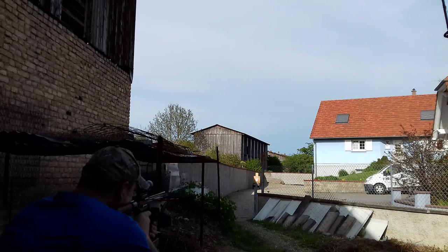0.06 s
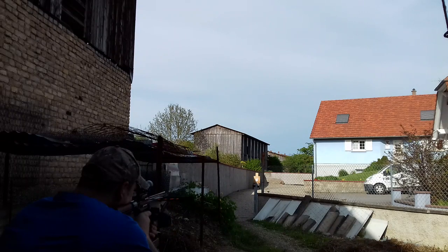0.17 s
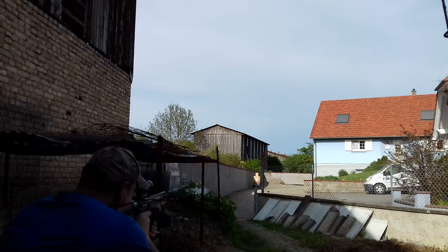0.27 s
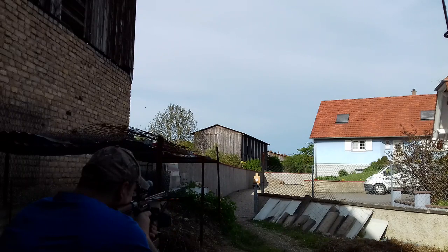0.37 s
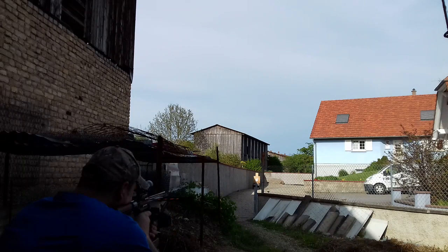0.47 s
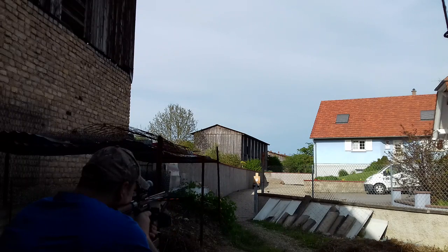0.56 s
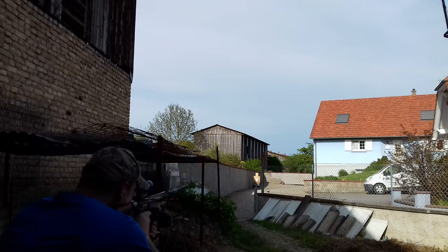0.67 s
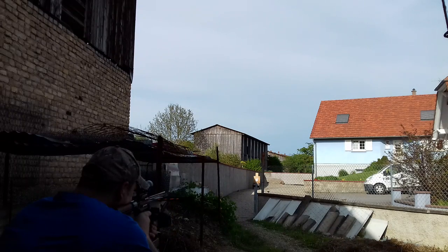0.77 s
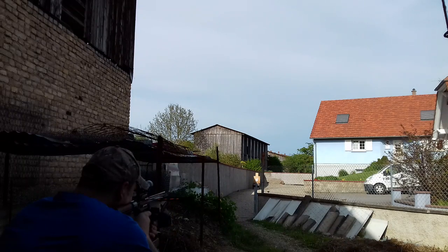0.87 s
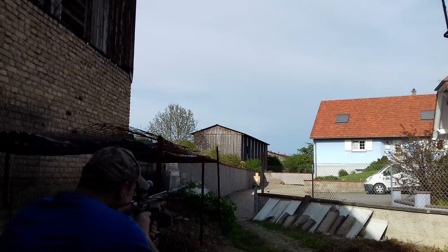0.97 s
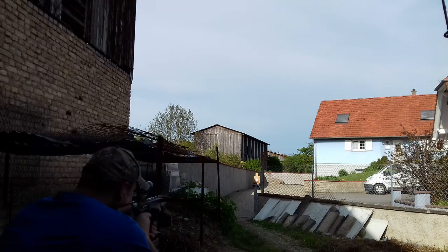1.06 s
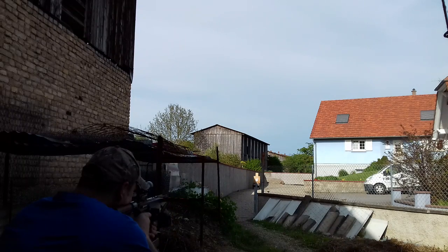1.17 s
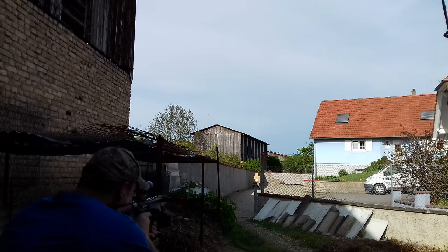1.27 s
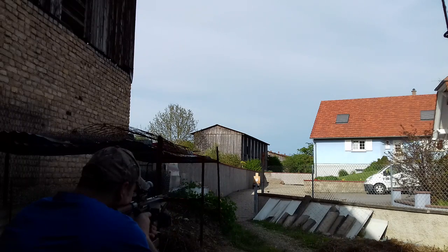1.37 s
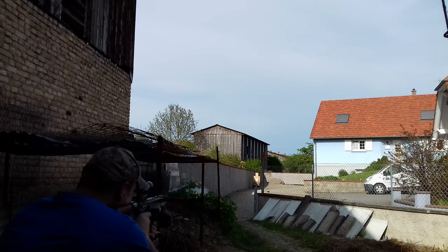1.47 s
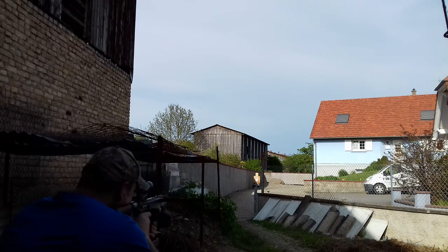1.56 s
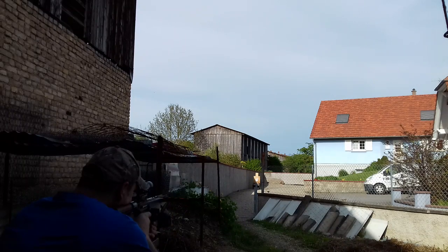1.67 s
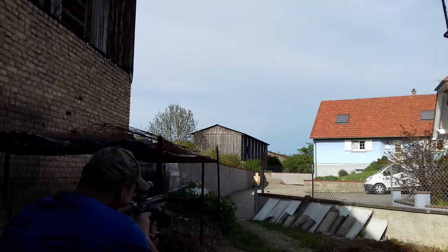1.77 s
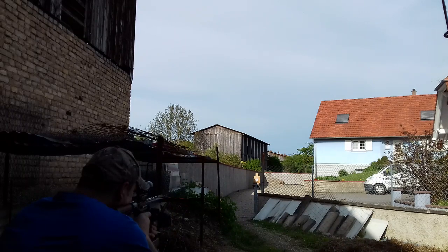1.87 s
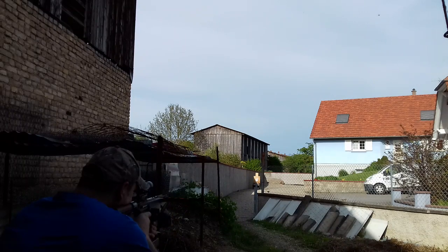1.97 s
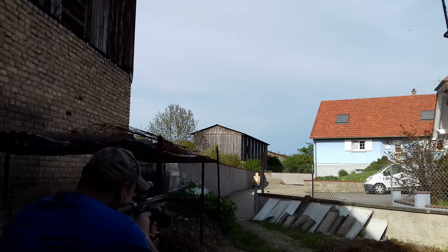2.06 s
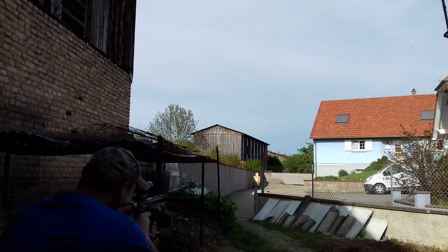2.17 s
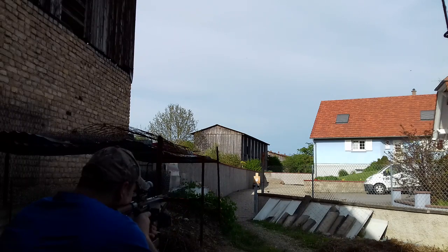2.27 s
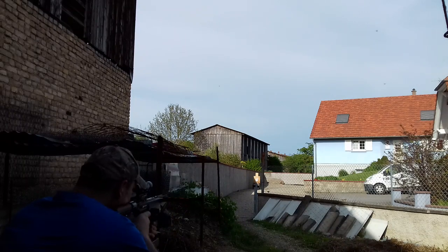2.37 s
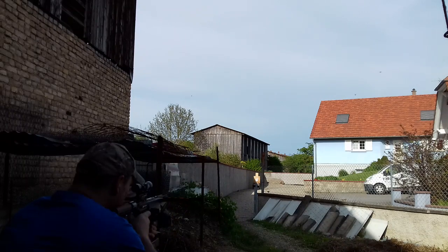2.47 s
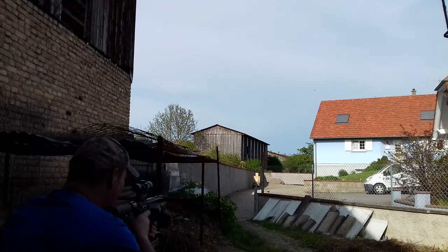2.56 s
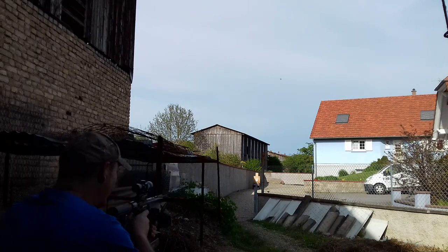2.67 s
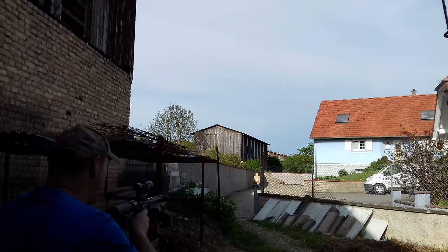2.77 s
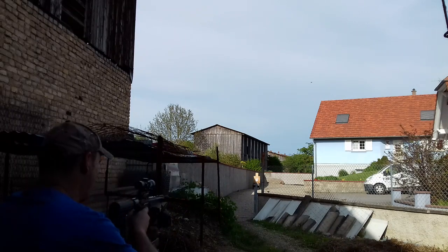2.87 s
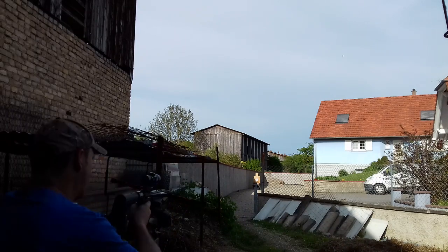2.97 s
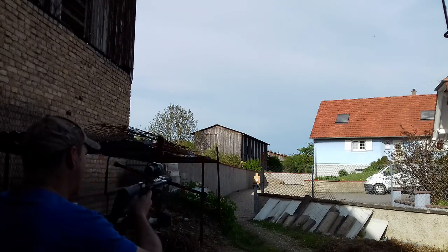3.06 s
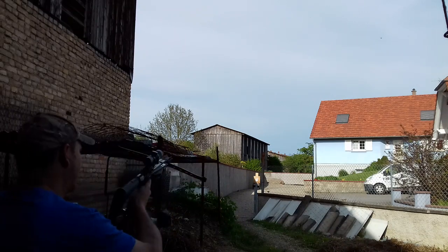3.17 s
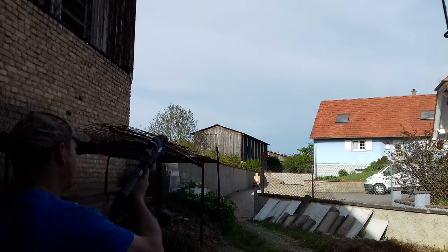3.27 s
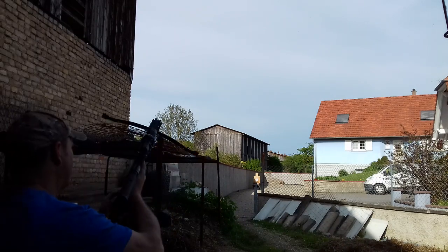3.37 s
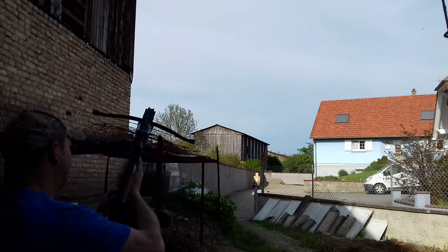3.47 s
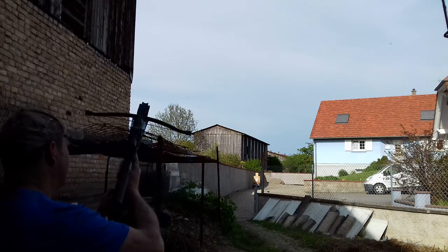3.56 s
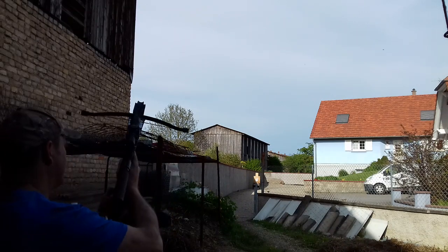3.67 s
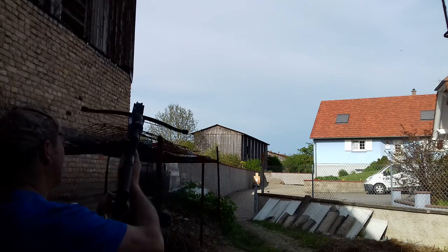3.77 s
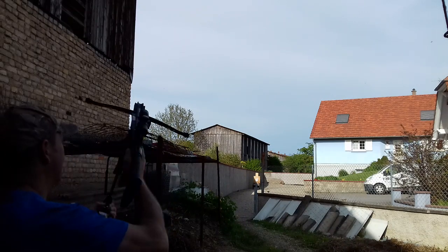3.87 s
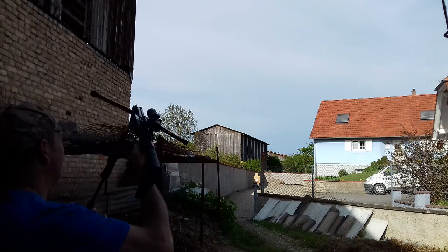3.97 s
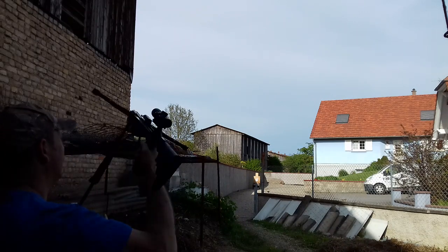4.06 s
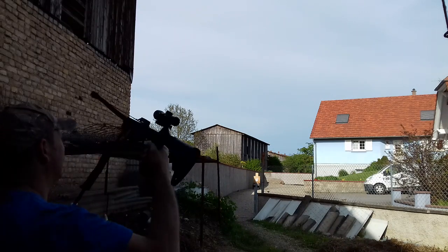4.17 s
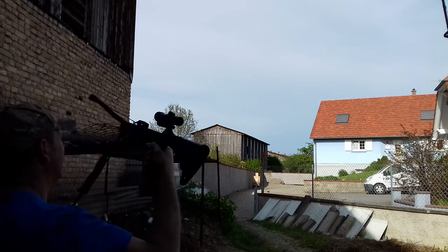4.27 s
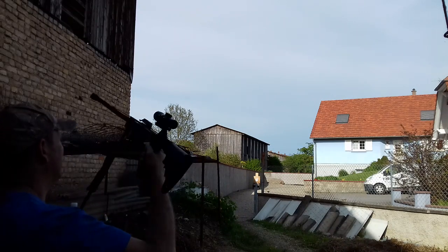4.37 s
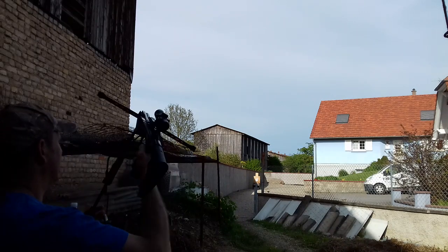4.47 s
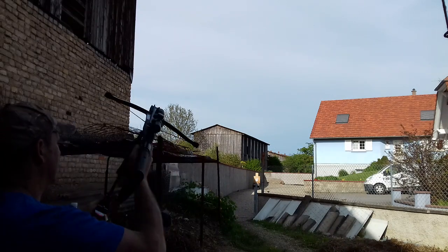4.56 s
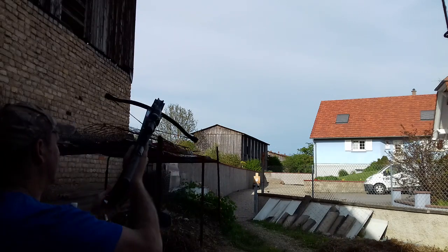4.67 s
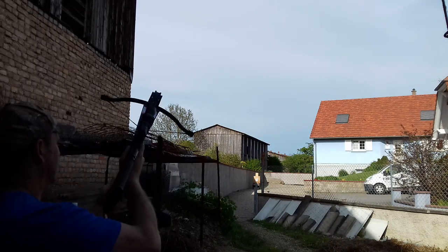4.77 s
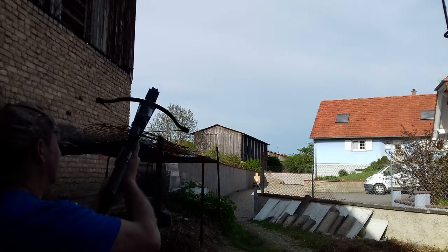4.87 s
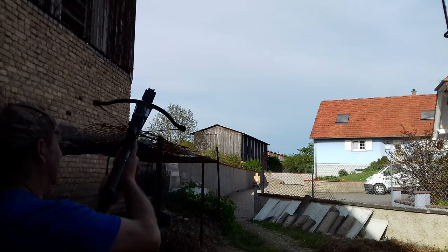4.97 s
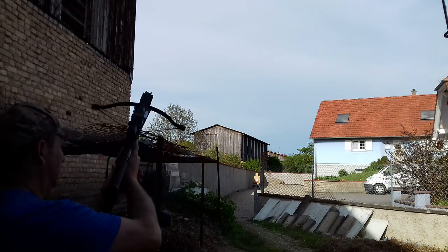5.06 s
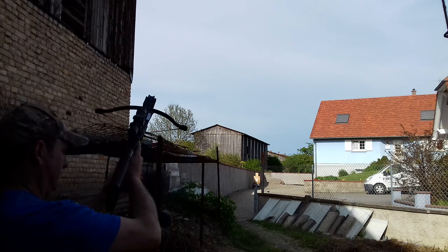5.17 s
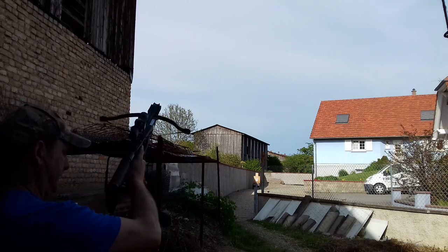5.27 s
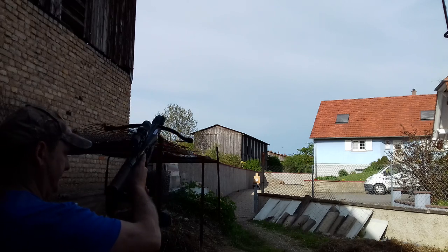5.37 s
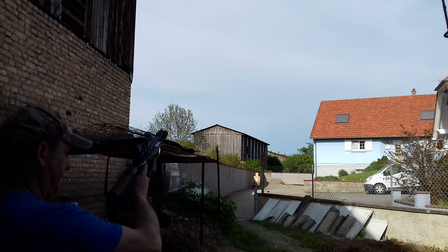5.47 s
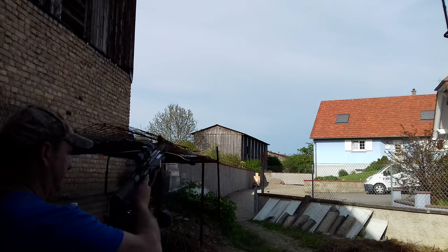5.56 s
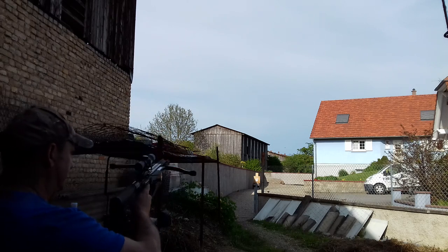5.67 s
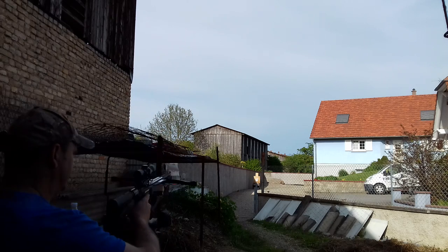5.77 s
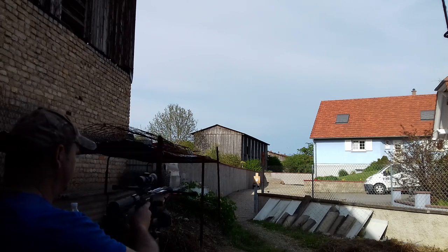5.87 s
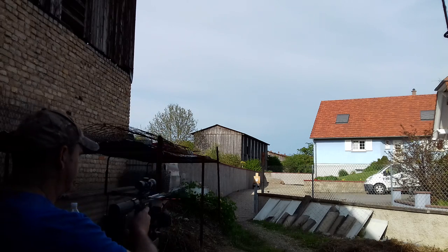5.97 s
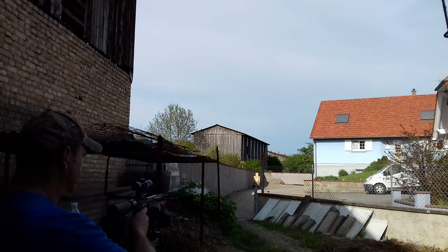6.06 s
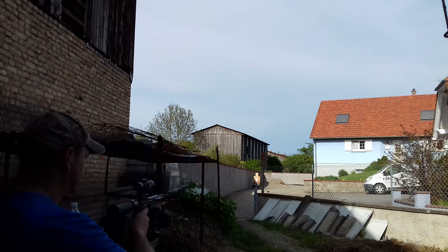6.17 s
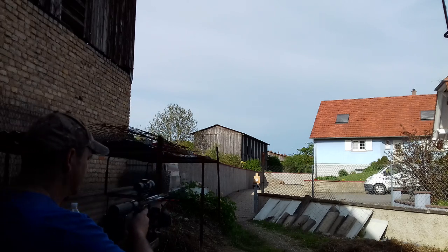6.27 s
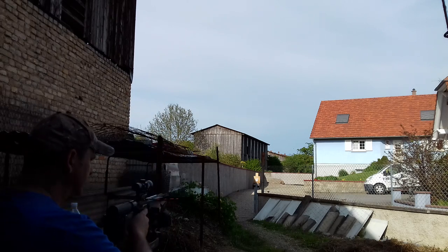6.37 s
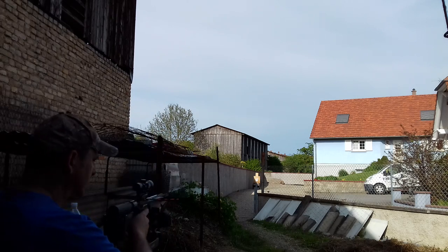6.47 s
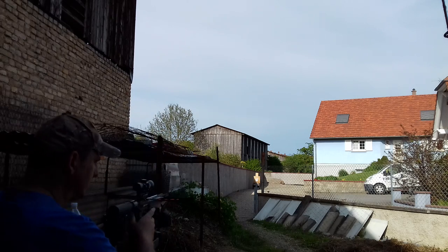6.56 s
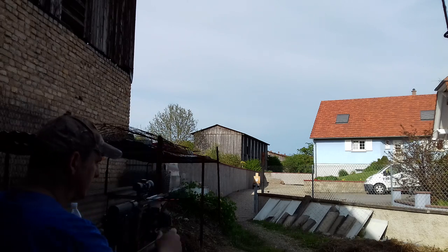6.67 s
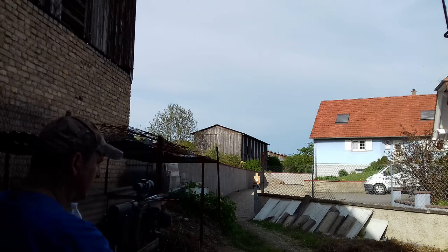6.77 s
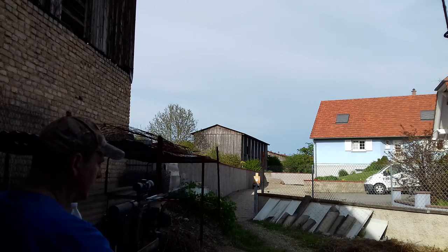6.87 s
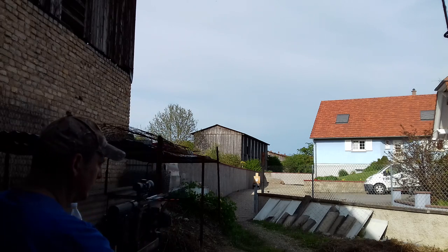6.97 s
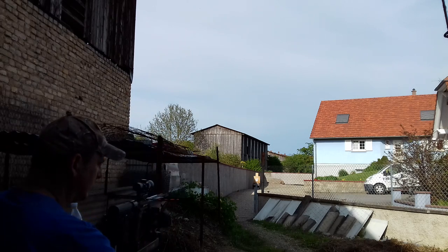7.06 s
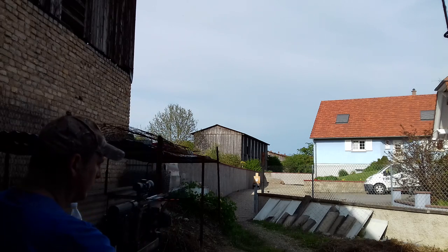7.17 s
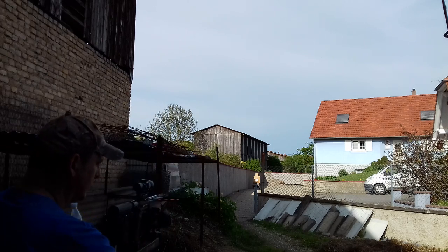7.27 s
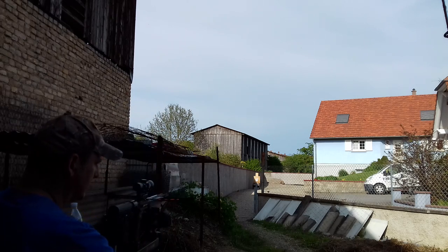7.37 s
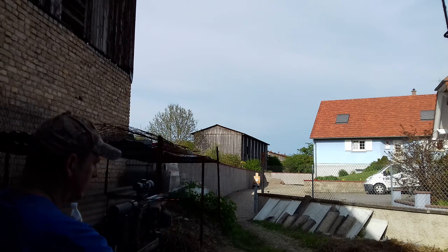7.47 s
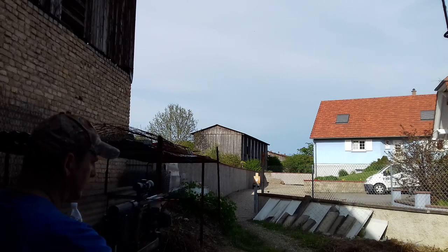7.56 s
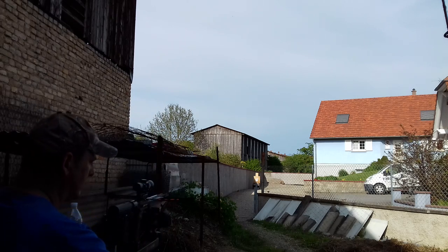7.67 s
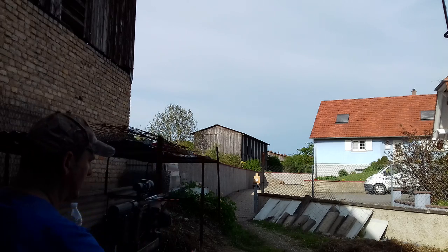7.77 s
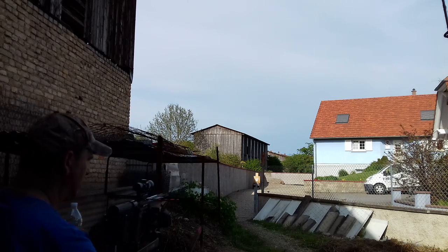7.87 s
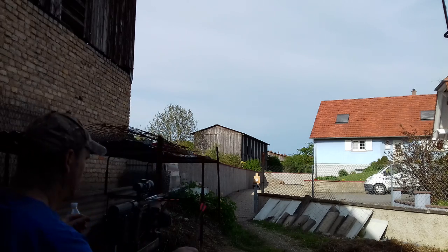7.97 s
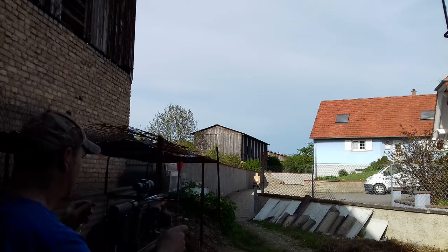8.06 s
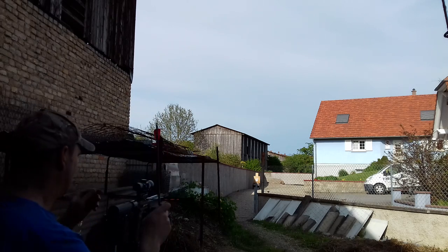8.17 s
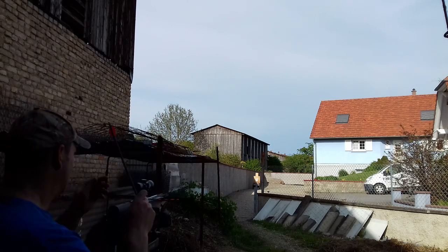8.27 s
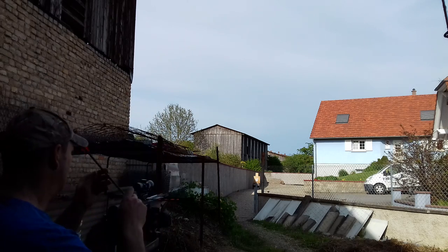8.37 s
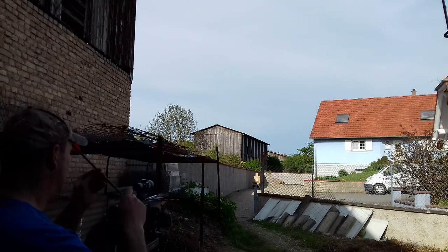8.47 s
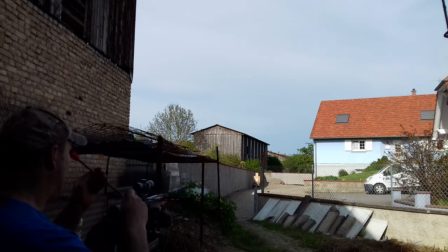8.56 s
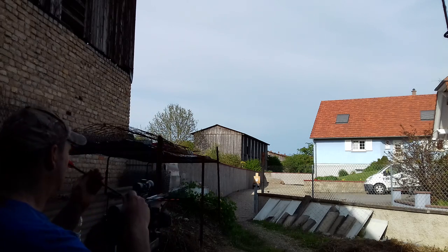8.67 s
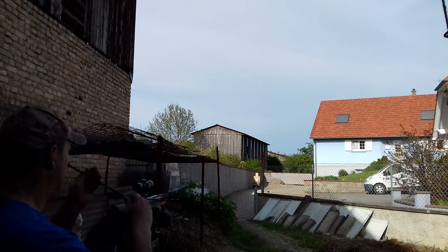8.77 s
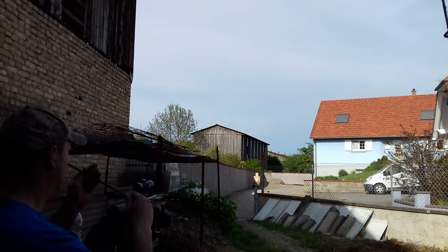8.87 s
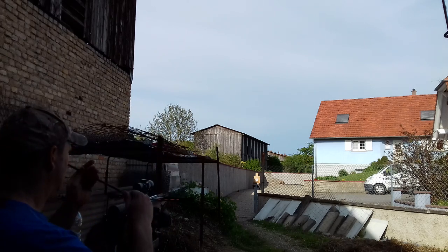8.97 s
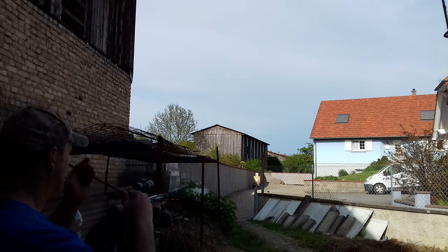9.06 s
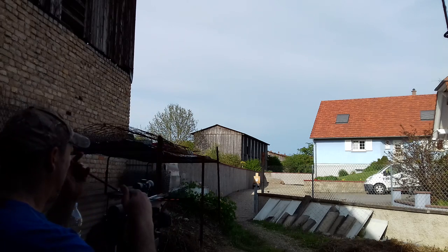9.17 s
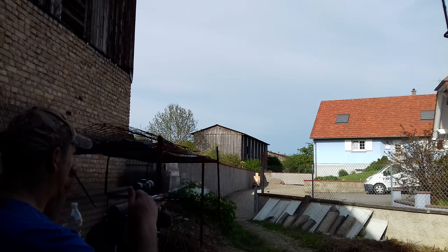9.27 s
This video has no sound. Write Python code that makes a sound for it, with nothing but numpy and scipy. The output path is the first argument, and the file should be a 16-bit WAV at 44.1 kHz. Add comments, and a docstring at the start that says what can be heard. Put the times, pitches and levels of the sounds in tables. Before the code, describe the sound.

A quiet outdoor yard with soft wind puffs on the microphone. At about one second a crossbow fires close by, a sharp, loud crack with a short echoing tail, followed by a faint dry knock from a distant target. Clothes rustle, small clicks follow, then the cocking lever is worked: creaky rubbing, a metallic clatter and a hard snap shut. Afterwards only light bumps, cloth brushes and a small springy ping.

```python
"""A quiet outdoor hush comes first, with light puffs of wind on the microphone: shaped noise.
Then a crossbow is fired in a walled yard, and its bolt knocks into a distant target: cracks, ringing modes and buzz.
The shooter works the cocking lever: the string rubs in noisy jerks, the catch clatters, the lever snaps shut.
Small parts click, clothes rustle as swelling noise, and buildings return smeared echoes over a decaying tail."""
import sys
import numpy as np
from scipy import signal
from scipy.fft import rfft, irfft, next_fast_len
from scipy.io import wavfile
from scipy.ndimage import uniform_filter1d, minimum_filter1d, map_coordinates

SR = 44100
rng = np.random.default_rng(int(sys.argv[2]) if len(sys.argv) > 2 else 0)


def master_out(mix):
    """Clip the mix to full scale and print it as 16-bit PCM to the path in sys.argv[1]."""
    frames = np.transpose(np.atleast_2d(mix))
    ceiling = np.clip(frames, -1, 1)
    pcm = np.round(ceiling * 32767).astype(np.int16)
    wavfile.write(sys.argv[1], SR, pcm)


N = 411012  # length in samples
T = np.arange(SR // 2) / SR  # half a second for one event, s
NOW = np.arange(N) / SR  # the whole scene, s


def amp(db):
    """Amplitude gain is ten to the power of decibels over twenty."""
    return 10 ** (np.asarray(db) / 20)


def unit(x):
    """Power normalisation: scale to rms 1."""
    return x / np.sqrt(np.mean(x ** 2) + 1e-20)


def unit_attack(x):
    """Onset normalisation: scale so that the first 5 ms have rms 1."""
    return x / np.sqrt(np.mean(x[:SR // 200] ** 2) + 1e-20)


def along(points, hz):
    """Spectral envelope: interpolate (Hz, value) points on a log frequency axis."""
    point_hz, value = np.transpose(points)
    return np.interp(np.log(hz + 1), np.log(point_hz + 1), value)


def curves(rows):
    """Linear trajectories: one value per sample for each column after the time."""
    s, *columns = np.transpose(rows)
    return [np.interp(NOW, s, column) for column in columns]


def filtered(x, response):
    """Linear filtering: multiply the spectrum by a response of frequency."""
    n = x.shape[-1]
    padded = next_fast_len(n + SR // 4)
    spectrum = rfft(x, padded) * response(np.fft.rfftfreq(padded, 1 / SR))
    return irfft(spectrum, padded)[..., :n]


def noise(spectrum, size=N):
    """Coloured noise: white noise shaped by (Hz, dB) points, at rms 1."""
    return unit(filtered(rng.standard_normal(size), lambda hz: amp(along(spectrum, hz))))


def wobble(rate):
    """Random modulation: a smooth curve through random knots, rate knots a second."""
    knots = rng.standard_normal(int(N * rate / SR) + 4)
    return map_coordinates(knots, [NOW * rate])


def add(track, s, sound):
    """Superposition: mix a sound into the track at time s."""
    part = track[round(s * SR):][:len(sound)]
    part += sound[:len(part)]


def swells(rows):
    """Gaussian envelopes: one gain swell for each (centre, half length, dB)."""
    return sum(amp(db) * np.exp(-((NOW - s) / half) ** 2) for s, half, db in rows)


def rise(start, length):
    """Linear onset: a ramp from silence to full gain."""
    return np.clip((NOW - start) / length, 0, 1)


def resonant(modes, hz):
    """Resonance: the gain of a body is the power sum of its damped modes."""
    centre, width, db = np.transpose(modes)[:, :, None]
    power = (amp(db) * hz * width) ** 2 / ((centre ** 2 - hz ** 2) ** 2 + (hz * width) ** 2)
    return np.sqrt(np.sum(power, 0))


def ring(modes, scatter_db):
    """Free vibration: decaying sines, each mode struck at a new strength every time."""
    hz, width, db = np.transpose(modes)[:, :, None]
    size = amp(db + scatter_db * rng.standard_normal(hz.shape))
    decay = np.exp(-np.pi * width * T)
    sines = np.sin(2 * np.pi * (hz * T + rng.random(hz.shape)))
    return unit_attack(np.sum(size * decay * sines, 0))


# distant hush. Columns: pitch_hz, level_db
HUSH_SPECTRUM = [(20, -19), (70, -4.5), (250, -1.5), (600, -3), (1200, -7), (2500, -13.5), (4200, -19.5),
                 (5000, -38), (16000, -46.5)]
# cloth on cloth. Columns: pitch_hz, level_db
RUSTLE_SPECTRUM = [(300, -17), (1200, -2.5), (2000, -3.5), (3000, -2.5), (4000, 1), (4800, -16),
                   (9000, -19), (16000, -39.5)]
# the shooter raises the bow, lowers it and reaches for a bolt. Columns: centre_s, half_length_s, level_db
CLOTH_MOVES = [(3.15, 0.67, -75), (5.4, 1, -72.5), (7.55, 0.62, -74)]
STILL_CLOTH_DB, HUSH_DB = -82, -67
DRONE_START_S, DRONE_RISE_S, DRONE_DB = 8.5, 0.13, -71


def outdoors():
    """Broadband noise and resonance: a steady hush, a faint late drone and clothes that rustle with each move."""
    hush = amp(HUSH_DB + 0.55 * wobble(9.6)) * noise(HUSH_SPECTRUM)
    drone_modes = [(530, 27, -3.5), (670, 18, -2.5)]  # Hz, width Hz, dB
    drone = unit(filtered(rng.standard_normal(N), lambda hz: resonant(drone_modes, hz)))
    cloth = np.hypot(amp(STILL_CLOTH_DB), swells(CLOTH_MOVES))
    grain = amp(1.2 * wobble(16) + 2.1 * wobble(150))
    rustle = cloth * grain * noise(RUSTLE_SPECTRUM)
    return hush + amp(DRONE_DB) * rise(DRONE_START_S, DRONE_RISE_S) * drone + rustle


# spells of breeze. Columns: centre_s, half_length_s, level_db
BREEZE_SPELLS = [(.7, 1.2, -70), (3.0, 0.81, -81)]
# eddies of wind. Columns: centre_s, peak level_db
WIND_PUFFS = [(.431, -56), (.505, -55.5), (.565, -60), (.756, -46.5), (0.795, -37.5), (.897, -46.5),
              (1.03, -51.5), (1.52, -43.5), (1.611, -44.5), (1.764, -46.5), (1.792, -36), (2.02, -48)]
CALM_DB = -86.5
# a stronger eddy is faster and shorter
EDDY_HZ, EDDY_REF_DB, EDDY_DB_PER_OCTAVE, EDDY_CYCLES = 104.1, -46.5, 27, 1.6


def wind():
    """Turbulent pressure: small eddies push on the microphone, over a light flutter that dies down."""
    flutter = noise([(20, -20), (55, 2), (110, 3.5), (190, -9.5), (300, -19.0), (1500, -80)])
    air = (amp(CALM_DB) + swells(BREEZE_SPELLS)) * flutter
    centre = T[-1] / 2
    for s, db in WIND_PUFFS:
        hz = EDDY_HZ * 2 ** ((db - EDDY_REF_DB) / EDDY_DB_PER_OCTAVE)
        spectrum = [(hz / 5, -26), (hz / 2, -4), (hz, 0), (hz * 2, -12), (hz * 4, -42), (hz * 10, -90)]
        eddy = noise(spectrum, size=len(T))
        eddy = eddy * np.exp(-((T - centre) * hz / EDDY_CYCLES) ** 2)
        add(air, s - centre, amp(db) * eddy / np.abs(eddy).max())
    return air


# sleeves and hands brush the stock. Columns: centre_s, level_db (before envelope and grain), pitch_hz
STOCK_BRUSHES = [(1.028, -60, 1140), (6.117, -69, 2960), (6.343, -72, 3208), (6.778, -70, 2390),
                 (7.101, -67, 3230), (7.179, -64.5, 1480), (7.324, -64.5, 1395), (7.389, -68, 1690),
                 (7.54, -64, 1590), (7.593, -63.5, 1474), (7.672, -70, 1500)]
BRUSH_HALF_S = 0.019


def brushes():
    """Friction noise: short, grainy swishes of cloth on the stock."""
    track, centre = np.zeros(N), T[-1] / 2
    envelope = np.exp(-((T - centre) / BRUSH_HALF_S) ** 2)
    for s, db, hz in STOCK_BRUSHES:
        # the level steps up 4 dB at the centre pitch
        spectrum = [(hz / 5, -25), (hz, -4), (hz, 0), (hz * 1.1, -3), (hz * 2, -14), (hz * 5, -38)]
        add(track, s - centre, amp(db) * noise(spectrum, size=len(T)) * envelope)
    return track * amp(1.4 * wobble(260))


# colour of a hard contact. Columns: pitch_hz, level_db
CRACK_SPECTRUM = [(100, -18.5), (300, -13), (800, -7), (1400, -0.5), (2300, -7), (3700, -1), (4700, -7.5),
                  (5200, -13), (7000, -16), (10000, -26), (15000, -42)]


def blows(rows, modes, tone, ring_db, buzz_db, buzz_t60):
    """Impact excitation: crack, ring and buzz of loose parts; thump, knock and edge levels weight the registers."""
    edges = [(150, 800), (800, 2200), (2200, 5000), (5000, 15000)]  # Hz
    registers = [signal.butter(5, band, "band", fs=SR, output="sos") for band in edges]
    body = resonant(modes, np.fft.rfftfreq(len(T), 1 / SR))
    track = np.zeros(N)
    for s, db, thump_db, knock_db, edge_db, t60 in rows:
        crack = amp(-60 * T / t60) * noise(CRACK_SPECTRUM, size=len(T))
        # loose parts chatter on the body and keep its resonances going
        chatter = irfft(body * rfft(rng.standard_normal(len(T))), len(T))
        buzz = amp(-60 * T / buzz_t60) * unit(chatter)
        blow = unit_attack(crack) + amp(ring_db) * ring(modes, scatter_db=4.5) + amp(buzz_db) * buzz
        blow = filtered(blow, lambda hz: amp(along(tone, hz)))
        for sos, weight_db in zip(registers, (thump_db, knock_db, 0, edge_db)):
            part = signal.sosfilt(sos, blow)
            loudest = uniform_filter1d(part ** 2, size=220).max()  # power over 5 ms
            add(track, s, amp(db + weight_db) * part / np.sqrt(loudest))
    return track


# In every table of blows, level_db is relative to the gain of its source.
# release, string stop and rattling limbs.
# Columns: start_s, level_db, thump_db, knock_db, edge_db, crack_t60_s
SHOT_BLOWS = [(1.0833, -11.5, -14, -10.5, -19.5, 0.034), (1.0873, -11.5, -9, -5.5, -17, 0.15),
              (1.0941, -8, -15, -12.5, -14.5, 0.019), (1.1004, -13.5, -14.5, -15, -21.5, 0.033),
              (1.11, -12, -21, 3, -16.5, 0.016), (1.1213, -17.5, -8, -8.5, -19.5, 0.16)]
# the bow as its string slams home. Columns: pitch_hz, width_hz, level_db
LIMB_MODES = [(262, 41, -6), (390, 19, -3.5), (499, 38, 0.5), (683, 17, -3), (1060, 81, 2), (1280, 46, -8),
              (1470, 58, -4), (1823, 80, 6.5), (2121, 44, -7.5), (2520, 50, -11), (2820, 82, -8),
              (2830, 74, -4), (3190, 70, -5), (3578, 68, -5.5), (3770, 54, 3.5), (3950, 57, 3.5),
              (4523, 47, 5), (4680, 29, 3.5)]
# colour of the shot, with a dip near 820 Hz that the other blows share. Columns: pitch_hz, level_db
SHOT_COLOUR = [(150, -2), (280, -8), (490, 6.5), (680, 1), (820, -5), (1080, 0.5), (1500, -1),
               (2500, -2), (3500, -2.5), (4800, -2.5), (5600, -1.5), (9000, 2), (15000, 2)]
# thud of the stock. Columns: pitch_hz, level_db
RECOIL_SPECTRUM = [(30, -22), (70, -8.5), (160, -5.5), (250, 0), (330, 1), (420, -4.5), (800, -34),
                   (2000, -70)]


def shot():
    """Impulsive release: the string slams home, limbs shudder, the stock thuds and a steel part rings briefly."""
    bow = amp(-8.0) * blows(SHOT_BLOWS, LIMB_MODES, SHOT_COLOUR, ring_db=-3.0, buzz_db=-10.5, buzz_t60=0.18)
    string_stop_s = SHOT_BLOWS[1][0]
    thud_envelope = amp(-60 * T / 0.23) * (1 - np.exp(-T / 0.0015))
    add(bow, string_stop_s, amp(-30.5) * noise(RECOIL_SPECTRUM, size=len(T)) * thud_envelope)
    add(bow, string_stop_s, amp(-40) * ring([(6212, 22, 0)], scatter_db=0))
    return bow


# near walls and farther buildings. Columns: delay_s, spread_s, level_db (before the wall colour)
WALL_ECHOES = [(0.014, 0.0079, -11.5), (0.057, 0.013, -26.5), (.133, 0.026, -20), (.25, 0.018, -31),
               (.35, .16, -44)]
# decay of the tail. Columns: pitch_hz, t60_s
YARD_DECAY = [(150, 0.98), (1500, 0.44), (4500, 0.68), (8000, 0.32), (15000, 0.15)]
# colour of the walls. Columns: pitch_hz, level_db
WALL_COLOUR = [(100, 0), (500, -3.5), (1100, 2.5), (1800, 5), (2600, -1), (3600, -0.5), (4800, -3.5),
               (6000, 2), (8000, -7), (15000, -17.5)]


def yard(x, tail_db):
    """Reflection and reverberation: near walls and farther buildings return smeared echoes over a thin tail."""
    age = np.arange(SR) / SR
    hz, t, z = signal.stft(rng.standard_normal(SR), SR, nperseg=256)
    decay = amp(-60 * t / along(YARD_DECAY, hz)[:, None])
    tail = signal.istft(z * decay, SR, nperseg=256)[1][:SR]
    answer = amp(tail_db) * tail / np.linalg.norm(tail)
    for delay, spread, db in WALL_ECHOES:
        echo = rng.standard_normal(SR) * np.exp(-((age - delay) / spread) ** 2)
        answer = answer + amp(db) * echo / np.linalg.norm(echo)
    answer = filtered(answer, lambda f: amp(along(WALL_COLOUR, f)))
    return signal.fftconvolve(x, answer)[:N]


# the bolt in the target and its shudder.
# Columns: start_s, level_db, thump_db, knock_db, edge_db, crack_t60_s
BOLT_BLOWS = [(1.8365, -32.5, 2, 2.5, -13.5, 0.031), (1.843, -49, 7.5, 7, -30, 0.029),
              (1.893, -59, 17.5, 13, -25, 0.063)]
# the target's resonances. Columns: pitch_hz, width_hz, level_db
TARGET_MODES = [(850, 94, 2), (1290, 53, -15), (1880, 130, 6), (2370, 39, 6), (2660, 35, -11),
                (3900, 35, -3), (4330, 23, -13)]
# how strongly the target radiates. Columns: pitch_hz, level_db
TARGET_RADIATION = [(150, 16), (450, 5), (700, -8), (2000, -8), (4400, 3), (6000, -1), (15000, -16)]


def bolt():
    """Damped impact: a dry knock from the far target."""
    return amp(-7.5) * blows(BOLT_BLOWS, TARGET_MODES, TARGET_RADIATION, ring_db=-14, buzz_db=-10, buzz_t60=0.15)


# light contacts of hands and lever. Columns: start_s, level_db, knock_db, edge_db
LIGHT_CONTACTS = [(2.9937, -32, -5, -20), (3.4215, -44, 2.5, -26), (3.464, -34.5, -14, -19),
                  (3.798, -27, -13, -20.5), (3.921, -50.5, 3, -30), (4.0037, -47, 4.5, -27),
                  (4.0385, -32, -10.5, -29), (4.4456, -40.5, -9, -5), (5.2105, -34.5, -13, -22),
                  (6.0539, -46.5, -10, -9), (6.765, -54.5, -1, -25), (7.0673, -55, 6, -17),
                  (7.0851, -44, -10, -14), (7.461, -42.5, -5, -3), (8.6105, -52.5, 4.5, -6)]
# resonances of the fittings. Columns: pitch_hz, width_hz, level_db
FITTING_MODES = [(1200, 130, 1.5), (1360, 70, -27), (1920, 410, -0.5), (2905, 110, -5.5), (3304, 61, 1.5),
                 (3680, 40, 0), (4036, 104, 0.5), (4400, 200, -8)]
# how strongly the fittings radiate. Columns: pitch_hz, level_db
CLICK_RADIATION = [(150, -19), (600, 2.5), (4500, 2), (5500, 5.5), (8000, -5), (15000, -6)]
# a small sprung steel part is struck. Columns: start_s, level_db (relative)
SPRING_PINGS = [(7.0876, -54), (7.462, -36.5)]
# its resonances. Columns: pitch_hz, width_hz, level_db
SPRING_MODES = [(1810, 16, -8), (2858, 33, 7), (3950, 24, -2.5), (5240, 41, -8.5)]
# the bow is set on its rest. Columns: start_s, level_db (relative)
REST_BUMPS = [(6.151, -45), (6.172, -52)]
# resonances of the rest. Columns: pitch_hz, width_hz, level_db
REST_MODES = [(252, 37, 2.5), (740, 32, -18), (1144, 51, -16), (1512, 73, -16), (1830, 71, -18)]
CLACK_THUMP_DB, CLACK_T60_S = -9.5, 0.036  # thump relative to the knock; decay of the crack


def handling():
    """Modal impact: small clicks of the fittings, pings of a spring and a soft bump on the rest."""
    contacts = []
    for s, db, knock_db, edge_db in LIGHT_CONTACTS:
        contacts.append((s, db, knock_db + CLACK_THUMP_DB, knock_db, edge_db, CLACK_T60_S))
    bow = amp(-10.5) * blows(contacts, FITTING_MODES, CLICK_RADIATION, ring_db=-2.5, buzz_db=-4, buzz_t60=0.15)
    for s, db in SPRING_PINGS:
        add(bow, s, amp(db - 2.0) * ring(SPRING_MODES, scatter_db=1.5) * (1 - np.exp(-T / 0.0031)))
    for s, db in REST_BUMPS:
        add(bow, s, amp(db + 7.5) * ring(REST_MODES, scatter_db=1) * (1 - np.exp(-T / 0.0036)))
    return bow


# the lever is pulled open, then pushed back.
# Columns: start_s, hold_s, fade_db_per_s, creak_level_db, scrape_level_db
LEVER_STROKES = [(3.897, 0.27, 188, -57, -62), (4.413, .19, 77, -63, -60)]
# the string grips harder for a moment. Columns: centre_s, half_length_s, level_db
STRING_SQUEAKS = [(4.235, 0.018, -58), (4.528, 0.016, -58)]
# the string grinds over the catch. Columns: centre_s, half_length_s, level_db
CATCH_CLIMB = [(4.275, .05, -42)]
# one list for each stroke. Columns: time_s, pitch_hz of the resonance
CREAK_PITCH = [
    [(3.9, 1432), (4.006, 1573), (4.038, 1417), (4.12, 1346), (4.22, 1510), (4.3, 1350)],
    [(4.43, 1540), (4.47, 1535), (4.516, 1308), (4.634, 1329), (4.76, 1468), (4.8, 1410)],
]
# string on rail. Columns: pitch_hz, level_db
SCRAPE_SPECTRUM = [(350, -51), (600, -17.5), (1120, -20.5), (1320, -25.5), (1560, -11), (1700, -18.5),
                   (2290, -16), (3980, -14.5), (4810, -20), (5800, -40), (12000, -42), (15600, -69.5),
                   (22000, -120)]
STROKE_ATTACK_S = 0.041


def string_rub():
    """Stick-slip friction: the string slips along the rail in tiny jerks, with a narrow, wandering creak."""
    creak_gain, scrape_gain = swells(STRING_SQUEAKS), swells(CATCH_CLIMB)
    for start, hold, fade_db_per_s, creak_db, scrape_db in LEVER_STROKES:
        fading_s = np.maximum(NOW - start - STROKE_ATTACK_S - hold, 0)
        effort = rise(start, STROKE_ATTACK_S) * amp(-fade_db_per_s * fading_s)
        creak_gain = creak_gain + amp(creak_db) * effort
        scrape_gain = scrape_gain + amp(scrape_db) * effort
    creak_hz, = curves(np.vstack(CREAK_PITCH))
    phase = 2 * np.pi * np.cumsum(creak_hz * (1 + 0.04 * wobble(70))) / SR
    grip = amp(3.25 * wobble(55))
    # two random quadrature parts make a narrow band of noise
    creak = unit(grip * (wobble(220) * np.sin(phase) + wobble(240) * np.cos(phase)))
    scrape = unit(grip * noise(SCRAPE_SPECTRUM) * amp(3.17 * wobble(320)))
    return creak_gain * creak + scrape_gain * scrape


# the catch hooks the string. Columns: start_s, level_db, thump_db, knock_db, edge_db, crack_t60_s
HOOK_BLOWS = [(4.221, -40, -20, -14, -14, 0.028), (4.2374, -41.5, -2, -11, -0.5, 0.042),
              (4.2553, -33, -21.5, -24, -9, 0.036), (4.2693, -18.5, -29, -18.5, -13.5, 0.043),
              (4.2764, -21.5, -33, -18, -22, 0.066), (4.2884, -25, -26, -15.5, -9, 0.026),
              (4.3015, -21.5, -44, -17.5, -8, 0.012)]
# resonances of the catch. Columns: pitch_hz, width_hz, level_db
CATCH_MODES = [(300, 7.6, -9), (408, 18, -2), (1120, 21, -7), (1260, 40, -6.5), (1580, 110, -11),
               (2330, 65, -3.5), (2640, 34, -8), (3354, 25, -1), (3470, 41, -16), (3861, 54, -4.5),
               (4340, 57, -6), (4693, 110, 1.5), (5670, 230, -8), (7500, 750, -19.5)]
# colour of the catch, with a dip near 560 Hz that the other blows share. Columns: pitch_hz, level_db
HOOK_COLOUR = [(150, -19), (290, 3), (560, -7), (1100, 5), (2500, -1), (4700, 0.5), (6000, -1),
               (9000, 0), (15000, -11)]
# the lever slams shut and settles. Columns: start_s, level_db, thump_db, knock_db, edge_db, crack_t60_s
CLOSE_BLOWS = [(4.9871, -11.5, -30.5, -9.5, -23.5, 0.029), (4.9934, -17, -25, -14.5, -26, 0.015),
               (4.9975, -5.5, -31, -4.5, -25.5, 0.046), (5.0114, -16, -14, -9.5, -14.5, 0.045),
               (5.0444, -25, -19, 0, -36, 0.022), (5.1024, -24.5, -20, -9, -25.5, 0.056)]
# resonances of frame and lever. Columns: pitch_hz, width_hz, level_db
FRAME_MODES = [(290, 27, -2.5), (399, 10, 6), (652, 21, 8.5), (1095, 48.9, -8), (1275, 43.1, -7.5),
               (1519, 37, 2.5), (1800, 58, 2.5), (2050, 330, -5.5), (2500, 80, -2), (2790, 46, -5.5),
               (2900, 66, -4), (3277, 60, 1.5), (3600, 56, -6.5), (3864, 150, 0.5), (4195, 60, -8),
               (4580, 51, -11.5), (5640, 250, -16.5)]
# colour of the slam, with dips near 520 and 820 Hz that the other blows share. Columns: pitch_hz, level_db
CLOSE_COLOUR = [(150, -10), (380, 0.5), (520, -8.5), (660, 0), (820, -8.5), (1100, -11.5), (1550, -1),
                (2100, -6), (2600, -3.5), (4200, -2), (5100, -2), (6200, 6), (9000, 1), (15000, -3.5)]


def cocking():
    """Repeated impact: the catch clatters onto the string, then the lever slams into the frame."""
    hook = amp(-3.5) * blows(HOOK_BLOWS, CATCH_MODES, HOOK_COLOUR, ring_db=-1.5, buzz_db=-4.5, buzz_t60=0.1)
    slam = amp(-10) * blows(CLOSE_BLOWS, FRAME_MODES, CLOSE_COLOUR, ring_db=-7.5, buzz_db=-5.0, buzz_t60=0.13)
    return hook, slam


def scene():
    """Superposition: direct sounds add to their echoes, and each source feeds the yard at its own level."""
    fired, hit = shot(), bolt()
    handled = handling() + string_rub() + brushes()
    hooked, closed = cocking()
    echoes = amp(3.0) * yard(fired, tail_db=-18.5)
    echoes += amp(-9.5) * yard(hit, tail_db=-6.0)
    echoes += amp(-3.5) * yard(closed + amp(-5.5) * hooked, tail_db=-17.5)
    echoes += amp(-2.0) * yard(handled, tail_db=-18.0)
    mono = fired + hit + hooked + closed + handled + echoes + wind() + outdoors()
    return np.array([mono, mono])


def gain_control(x, threshold_db, depth_db):
    """Level compression: a sustained loud sound turns the gain down; it holds, then creeps back."""
    power = uniform_filter1d(x[0] ** 2, size=SR // 10)
    level_db = 10 * np.log10(np.abs(power) + 1e-12)
    cut_db = np.clip(threshold_db - level_db, -depth_db, 0)
    hold = SR + SR // 4  # 1.25 s
    # both windows look back in time
    held = minimum_filter1d(cut_db, hold, origin=(hold - 1) // 2)
    return x * amp(uniform_filter1d(held, SR // 3, origin=(SR // 3 - 1) // 2))


# microphone hiss. Columns: pitch_hz, level_db
HISS_SPECTRUM = [(100, -4.5), (5000, -2.5), (8700, 0), (10000, -7), (11500, 1.5), (15500, -1.5)]
# sound from all around. Columns: pitch_hz, level_db
DIFFUSE_SPECTRUM = [(18, -37), (30, -8.5), (140, -0.5), (256, -1.5), (921, -1.5), (3880, -8), (4910, -16),
                    (8500, -15.5), (9940, -17.5), (14000, -15), (15500, -20.5)]
TOP_HZ = 15750


def record(dry):
    """Sum and difference: a nearly mono pair with opposed diffuse sound, faint hiss, gain control and band limit."""
    hiss = amp(-77.5) * noise(HISS_SPECTRUM)
    delayed = np.roll(dry[0], SR // 4000)  # 0.25 ms
    side = amp(-47.5) * delayed + amp(-71.5) * noise(DIFFUSE_SPECTRUM)
    pair = dry + hiss + side * np.array([[1], [-1]])
    sound = gain_control(pair, threshold_db=-22.5, depth_db=3)
    return filtered(sound, lambda hz: hz < TOP_HZ)


dry = scene()
out = record(dry)
master_out(out)
```